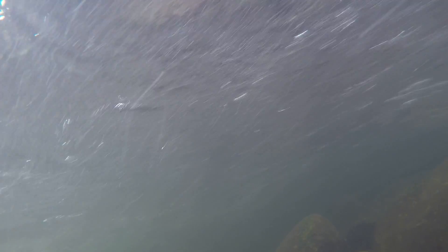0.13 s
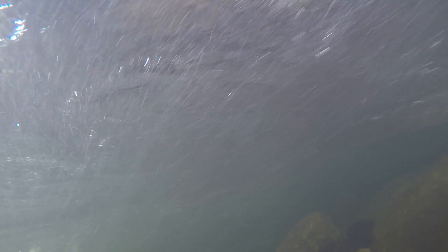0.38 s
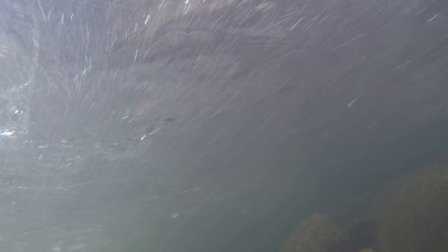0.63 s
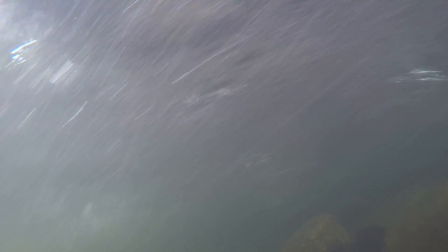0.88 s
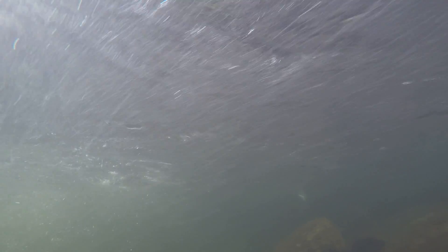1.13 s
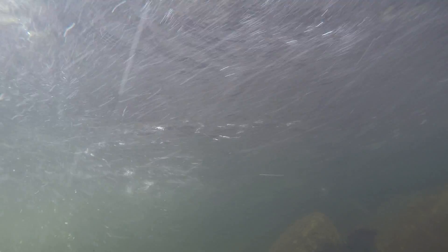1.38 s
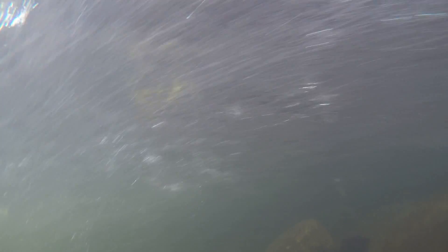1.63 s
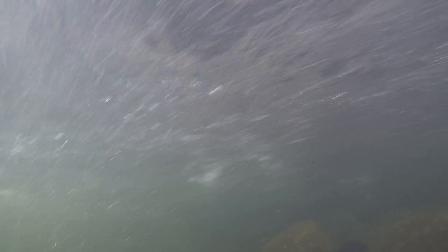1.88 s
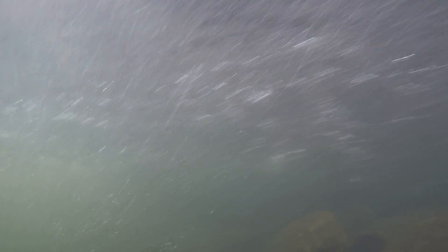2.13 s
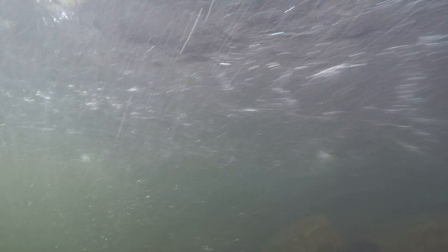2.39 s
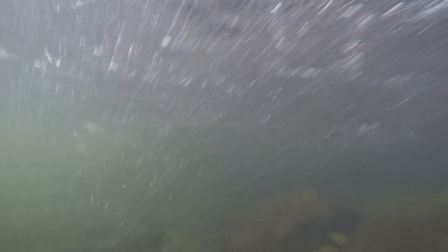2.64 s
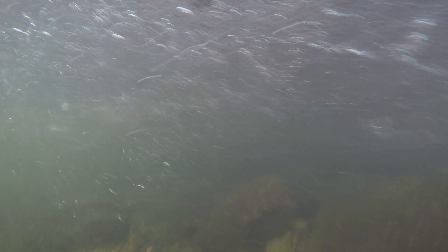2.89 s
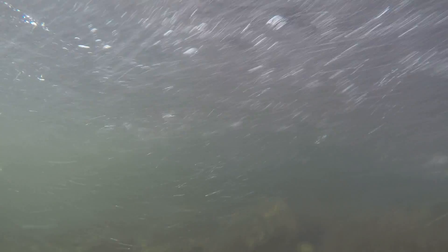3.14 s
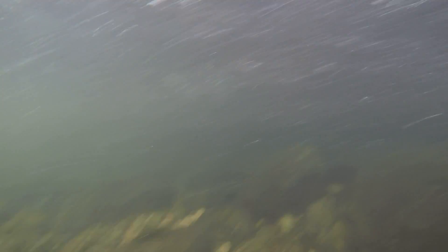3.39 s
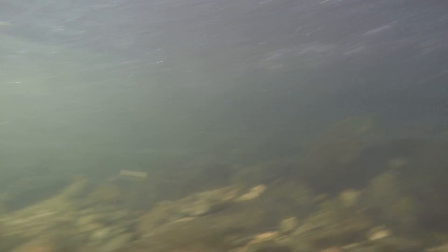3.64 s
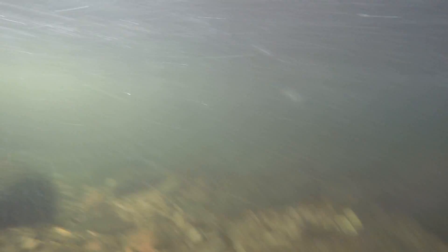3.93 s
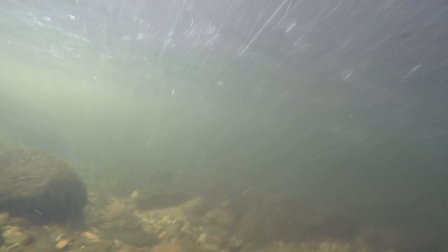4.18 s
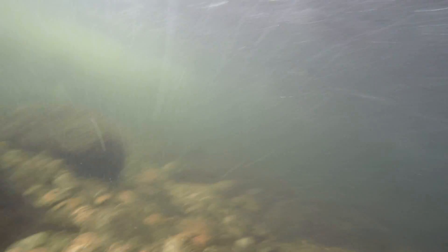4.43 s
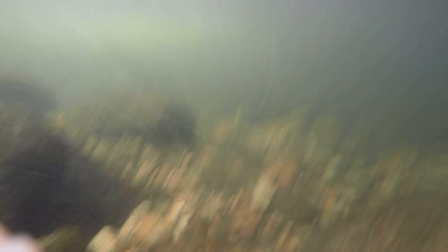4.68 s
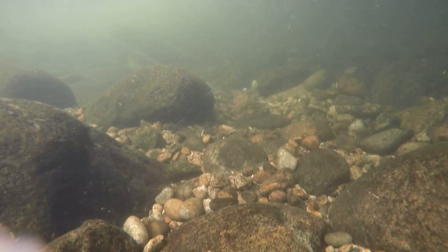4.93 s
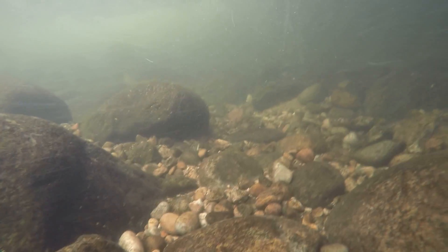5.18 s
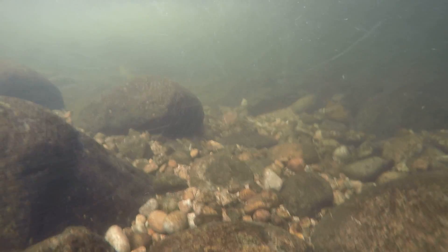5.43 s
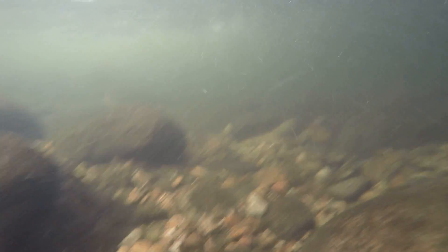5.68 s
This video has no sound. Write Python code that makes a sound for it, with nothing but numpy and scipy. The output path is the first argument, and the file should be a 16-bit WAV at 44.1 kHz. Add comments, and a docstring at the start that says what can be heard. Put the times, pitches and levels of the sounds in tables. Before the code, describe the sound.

A sealed camera housing sits in a fast shallow stream. Muffled, boxy water rush, low rumble and small bubble plinks run first, with a hard knock near one second. Loud knocks and gritty scraping follow after two seconds, then the water dips and swells back. Another heavy clack past four seconds starts a bout of rubbing over much fainter water. The microphone is inside the case, close and dry, overloading on the hits.

```python
"""Sealed camera housing in a fast stream

A sealed camera housing is held under a fast shallow stream. Noise and small impacts of water, with chirped
bubbles, are heard through damped modes of the housing; low-passed noise is the rumble of the current.
Knocks and stick-slip rubbing drive the same modes and overload the microphone; trapped air hums on.
The background sinks at times and creeps back; a faint electronic whine pulses at the frame rate."""
import sys
import numpy as np
from scipy import signal
from scipy.io import wavfile

SR = 44100
rng = np.random.default_rng(int(sys.argv[2]) if len(sys.argv) > 2 else 0)


def volts_from_decibels(level):
    """Turn decibel levels (scalar or array-like) into linear amplitude factors."""
    exponent = np.asarray(level, float) / 20
    return 10 ** exponent


def master(y):
    """Save y as 16-bit WAV."""
    cut = np.clip(np.atleast_2d(y).T, -1, 1)
    pcm = np.round(cut * 32767)  # scale
    wavfile.write(sys.argv[1], SR, pcm.astype(np.int16))


N = 255780  # samples, 5.8 s

# Modes of the housing: pitch_hz, touched_t60_s, touched_db, water_db (both are relative mode levels)
HOUSING_MODES = [(62.5, 0.011, -1, -22), (119.1, 0.074, -4.5, -17.5), (173.4, 0.044, -12.5, -22),
                 (253.8, .05, -12.5, -30), (341.4, 0.016, -8.5, -18.5), (439, 0.024, -13, -12.5),
                 (613, 0.047, -9, 8.5), (767.5, 0.017, -20.5, 3.5), (1113, 0.019, -15, -4.5),
                 (1244, 0.036, -14, -21), (1556, 0.011, -15.5, 0.5), (2417, 0.0041, -6.5, -8.5),
                 (2741, 0.0077, -4, -5), (3400, 0.0018, -11, -15), (4290, 0.0013, -16, -16),
                 (5194, 0.0016, -18.5, -21), (8420, 0.00084, -34.5, -31), (12300, 0.003, -38.5, -58.5)]
# Jolts of the trapped air: start_s, peak_db
AIR_JOLTS = [(2.666, -22), (2.704, -22.5)]
POCKET_HZ, POCKET_T60_S = 267.7, 0.14  # resonance of the trapped air


def rms_one(x):
    """Normalization by the root mean square."""
    return x / np.sqrt(np.mean(x ** 2) + 1e-20)


def drift(rate_hz):
    """Slow random fluctuation: noise through two equal one-pole low-passes, of rms 1."""
    pole = np.exp(-40 * np.pi * rate_hz / SR)  # drawn at SR / 20, then interpolated
    noise = rng.standard_normal(N // 20 + 3002)
    slow = signal.lfilter([1], [1, -2 * pole, pole * pole], noise)[3000:]
    return np.interp(np.arange(N) / 20, np.arange(len(slow)), rms_one(slow))


def low_pass(x, hz):
    """Second-order low-pass: attenuation of 12 dB per octave far above the corner."""
    return signal.sosfilt(signal.butter(2, hz, fs=SR, output="sos"), x)


def high_pass(x, order, hz):
    """Butterworth high-pass: attenuation below the corner."""
    return signal.sosfilt(signal.butter(order, hz, "high", fs=SR, output="sos"), x)


def resonate(x, hz, t60_s):
    """Damped resonance of one mode, falling steeply above its pitch; keeps white noise near its rms."""
    radius, angle = volts_from_decibels(-60 / (t60_s * SR)), 2 * np.pi * hz / SR
    gain = np.sqrt((1 - radius * radius) / 2)
    poles = [1, -2 * radius * np.cos(angle), radius * radius]
    rung = signal.lfilter([gain, 0, -gain], poles, x + 1e-18)
    return signal.sosfilt(signal.butter(4, 0.99 * hz, fs=SR, output="sos"), rung)


def grains(per_s, spread_db):
    """Random impulse train: clicks of uneven size and sign at chance moments, of rms 1."""
    sizes = volts_from_decibels(spread_db * np.minimum(rng.exponential(1, N), 5)) * rng.choice([-1, 1], N)
    return rms_one(sizes * (rng.random(N) < per_s / SR))


def add(out, sound, s):
    """Superposition: a sound is summed in at a time in seconds."""
    at = max(int(s * SR), 0)
    out[at:at + len(sound)] += sound[:N - at]


def knock_pushes():
    """Impact excitation: each contact force starts at once and decays exponentially, in three mode ranges."""
    # start_s, thump_db, body_db, click_db, contact_ms (decay by a factor e)
    knocks = [(1.133, 10.5, 7.5, 5, 0.1), (2.239, 17, 17, 5, 0.1), (2.253, -2, -12, -16, 0.65),
              (2.702, -24.5, -11.5, -10, 0.38), (4.2926, 14, 17.5, 6, 0.13), (4.2962, -10, 4.5, 2, 0.47),
              (4.302, -17, 3, -0.5, .6), (4.897, -28, -18, -12, 0.2), (4.951, -26.5, -37, -30, 0.22),
              (5.566, -41, -28, -20.5, 0.6), (5.604, -51, -31, -27, 0.59)]
    pushes = np.zeros((3, N))
    for s, thump_db, body_db, click_db, contact_ms in knocks:
        shape = np.exp(-np.arange(2000) * 1000 / (contact_ms * SR))
        for row, db in zip(pushes, (thump_db, body_db, click_db)):
            add(row, volts_from_decibels(db) * shape, s)
    return pushes


def rubbing_drags():
    """Stick-slip friction: uneven drag in strokes, with slips that rise fast and fade, in three mode ranges."""
    # start_s, end_s, drag_db, thump_db, rasp_db (thump and rasp are relative to the body)
    strokes = [(1.124, 1.141, -16, -1, -12.5), (2.268, 2.284, -25, -3, -15.5), (2.337, 2.354, -35, 15, -8),
               (2.376, 2.431, -22.5, 9.5, -16.5), (2.437, 2.57, -15, 3, -11.5),
               (2.574, 2.645, -37, 2.5, -7.5), (4.317, 4.347, -46.5, 5, -10), (4.508, 4.562, -33, 0, -7.5),
               (4.604, 4.687, -25, -0.5, -8), (4.684, 4.716, -26.5, -2.5, -16.5),
               (4.724, 4.757, -10, -1.5, -9.5), (4.76, 4.817, -19, 1, -9.5), (4.828, 4.873, -24, -1, -8.5),
               (4.892, 4.933, -26, 3, -14), (5.036, 5.154, -25, -1.5, -13), (5.394, 5.427, -33, -6, -10),
               (5.466, 5.493, -41, -9, -17), (5.702, 5.8, -20, -6.5, -16)]
    # The strongest slips: time_s (just past the peak), body_db, length_ms (the rise takes 0.4 of it)
    slips = [(2.385, -23, 17), (2.412, -13, 8.8), (2.441, -10.5, 22), (2.458, -3, 13.4), (2.522, -12, 38),
             (2.538, -12, 12), (2.548, 1.5, 14), (2.573, -5.5, 5), (2.586, -10.5, 8.3), (2.597, -1, 4.9),
             (2.613, -6.5, 10.5), (2.627, -1.5, 2), (2.639, -8.5, 9.8), (4.541, -16.5, 16.2),
             (4.643, -8, 52), (4.667, -2.5, 24.8), (4.705, -4, 7.9), (4.744, -8, 7.4), (4.775, -13.5, 16.5),
             (4.79, -23, 11), (4.808, -12, 10.7), (4.865, -21.5, 7.3), (4.927, -34.5, 13),
             (5.049, -3.5, 13.4), (5.063, -26, 40), (5.078, -10, 7.4), (5.133, -19, 5.7),
             (5.166, -25.5, 18), (5.184, -26.5, 6.1), (5.384, -14.5, 11), (5.397, -6.5, 17.3),
             (5.723, -23.5, 30), (5.759, -16.5, 33), (5.789, -17, 21)]
    edge_s = 0.0031  # how fast a stroke sets in and lets go
    catch_db, catch_hz = 5, 130     # the drag catches and lets go in all ranges at once
    judder_db, judder_hz = 0.5, 40  # each range also wavers on its own
    rubs = np.zeros((3, N))
    own_judder = judder_db * np.array([drift(judder_hz) for row in rubs])
    unevenness = volts_from_decibels(catch_db * drift(catch_hz) + own_judder)
    for start, end, drag_db, thump_db, rasp_db in strokes:
        t = np.arange(int((end - start) * SR)) / SR
        edge = np.clip(np.minimum(t, end - start - t) / edge_s, 0, 1)
        for row, uneven, db in zip(rubs, unevenness, (thump_db, 0, rasp_db)):
            add(row, volts_from_decibels(drag_db + db) * edge * uneven[int(start * SR):][:len(t)], start)
    for s, body_db, length_ms in slips:
        # coloured like the latest stroke begun
        thump_db, rasp_db = [stroke for stroke in strokes if stroke[0] < s][-1][3:]
        rise = length_ms * SR / 2500  # samples to the peak
        u = np.arange(int(8 * rise)) / rise
        burst = (u * np.exp(1 - u)) ** 2
        for row, db in zip(rubs, (thump_db, 0, rasp_db)):
            add(row, volts_from_decibels(body_db + db) * burst, s - 1.24 * rise / SR)
    return rubs


def handling():
    """Modal excitation: knocks and gritty rubbing force the low, middle and high modes of the housing."""
    low_top_hz, mid_top_hz = 400, 2000
    grit = grains(per_s=12000, spread_db=2)
    force = rubbing_drags() * grit - knock_pushes() * (1 + 0.76 * grit)
    out = np.zeros(N)
    for k, (hz, t60_s, touched_db, water_db) in enumerate(HOUSING_MODES):
        mode_range = int(hz > low_top_hz) + int(hz > mid_top_hz)
        sign = (-1) ** k  # neighbouring modes have opposite sign
        out += sign * volts_from_decibels(touched_db) * resonate(force[mode_range], hz, t60_s)
    return out


def air_pocket():
    """Free vibration: after a jolt trapped air hums as an exponentially decaying sine."""
    out, t = np.zeros(N), np.arange(SR // 2) / SR
    for s, peak_db in AIR_JOLTS:
        add(out, volts_from_decibels(peak_db - 60 * t / POCKET_T60_S) * np.sin(2 * np.pi * POCKET_HZ * t), s)
    return out


def bubble(size, hz, cycles, rise):
    """Bubble resonance: it swells, rings a few cycles and dies while its pitch climbs from hz."""
    turn = np.arange(int(3 * cycles * SR / hz)) * hz / SR  # time in cycles of the starting pitch
    swell = (1 - np.exp(-turn / 0.54)) ** 2 * np.exp(-2 * turn / cycles)
    return size * swell / swell.max() * np.sin(2 * np.pi * turn * (1 + rise * turn / cycles))


def loud_bubbles():
    """Isolated bubble resonances that stand out of the rush."""
    # time_s (about three cycles after the start), peak_db, starting_pitch_hz
    bubbles = [(0.008, -26, 2015), (0.183, -31.5, 700), (1.048, -31, 990), (1.251, -33, 2550),
               (1.426, -39.5, 3350), (1.643, -35.5, 4180), (1.698, -28.5, 2930), (1.715, -27, 1540),
               (1.73, -30.5, 3540), (1.742, -28.5, 726), (1.897, -33, 740), (2.316, -35, 2560),
               (2.684, -46, 1610.0), (3.056, -32.5, 2940), (3.325, -26.5, 2960), (3.327, -26.5, 693),
               (3.352, -24.5, 1640), (3.361, -36.5, 3680), (3.583, -36, 1620.0), (3.7, -26, 646),
               (3.766, -30, 655), (3.792, -30, 755), (4.124, -24.5, 616), (5.671, -53, 2560)]
    out = np.zeros(N)
    for s, peak_db, hz in bubbles:
        add(out, bubble(volts_from_decibels(peak_db), hz, cycles=12.6, rise=0.024), s - 3.02 / hz)
    return out


def rush(together_db, own_db, damping, ticks_db):
    """Random excitation of modes: water impacts and lone grit grains, swelling together and mode by mode."""
    out = np.zeros(N)
    swell_db = together_db * drift(9)
    ticks = volts_from_decibels(ticks_db) * grains(per_s=36, spread_db=4.5)
    for hz, t60_s, touched_db, water_db in HOUSING_MODES:
        impacts = volts_from_decibels(swell_db + own_db * drift(24)) * rng.standard_normal(N)
        shaken = resonate(impacts + ticks, hz, t60_s * damping)
        out += volts_from_decibels(water_db) * high_pass(shaken, 2, 0.81 * hz)
    trapped = np.arange(N) / SR > AIR_JOLTS[0][0]  # the air pocket hums along once it is caught
    pocket_db = -0.5  # on the scale of the water levels of the modes
    out += volts_from_decibels(pocket_db) * resonate(trapped * rng.standard_normal(N), POCKET_HZ, POCKET_T60_S)
    return rms_one(out)


def fizz(count, level_db, spread_db, low_hz, high_hz, cycles):
    """Random superposition of bubble resonances: small bubbles swept past at chance moments and pitches."""
    out = np.zeros(N)
    for when, pitch, size in rng.random((count, 3)):
        hz = low_hz * (high_hz / low_hz) ** pitch
        size_db = level_db - spread_db * np.log(1 - .98 * size)
        add(out, bubble(volts_from_decibels(size_db), hz, cycles, rise=0.079), when * N / SR)
    return out


def rumble():
    """Turbulent pressure: eddies push on the shell, as lumpy noise far down in the bass."""
    return rms_one(low_pass(rng.standard_normal(N), 44.6) * volts_from_decibels(2.5 * drift(0.91)))


def electronics(hushed):
    """Electronic noise and square gating: preamplifier hiss of rms 1 and a whine on for half of every frame."""
    frames_per_s, whine_start_s = 23.976, .019
    whine_hz, whine_db, hiss_hz = 10287, -7, 5000  # whine peak relative to the hiss rms
    t = np.arange(N) / SR
    on = ((t - whine_start_s) * frames_per_s % 1 < .5) & ~hushed
    dull = signal.lfilter([1], [1, -np.exp(-2 * np.pi * hiss_hz / SR)], rng.standard_normal(N))
    hiss = rms_one(low_pass(dull, 14000))
    return hiss + volts_from_decibels(whine_db) * on * np.sin(2 * np.pi * whine_hz * t)


def sinking_db(t):
    """Piecewise linear attenuation in dB: each sink falls, then climbs at its own rate; the deepest holds."""
    # start_s, depth_db, fall_s, recovery_db_per_s
    sinks = [(2.62, 21, 0.11, 23), (4.278, 6.5, .004, 4), (5.325, 12.5, 0.008, 2.5)]
    depths = []
    for s, depth_db, fall_s, recovery in sinks:
        falling = depth_db * (t - s) / fall_s
        climbing = depth_db - recovery * (t - s - fall_s)
        depths.append(np.clip(np.minimum(falling, climbing), 0, None))
    return -np.max(depths, axis=0)


def scene():
    """Linear superposition of handling, water and electronics at the one microphone."""
    # Vigour of the current, as the level of its rush before any sinking: time_s, level_db
    flow = [(0, -47), (.5, -41), (.95, -41), (1.3, -44), (2.2, -38.5), (3.2, -38.5), (3.8, -39.5),
            (4.3, -43), (4.9, -48.5), (5.2, -40.5), (5.8, -47)]
    t = np.arange(N) / SR
    flow_db = np.interp(t, *np.transpose(flow))
    sunk_db = sinking_db(t)
    hushed = (t > 4.28) & (t < 5.335)  # for a while the water is much fainter and the whine is silent
    rush_db = flow_db + 0.73 * sunk_db - 12.5 * hushed  # the rush takes a share of each sink
    # the rumble follows a share of the swing of the rush
    rumble_db = -30.5 + 0.39 * (flow_db - flow_db.mean()) + sunk_db - 8 * hushed
    hiss_db = -67.5 + sunk_db
    water = rush(together_db=1, own_db=4.0, damping=0.93, ticks_db=-6.5)
    # fizz levels are relative to the rush
    water += fizz(count=800, level_db=-19, spread_db=4, low_hz=2300, high_hz=6140, cycles=15)
    water += fizz(count=400, level_db=-8.5, spread_db=-0.5, low_hz=554, high_hz=898, cycles=8.6)
    water += fizz(count=200, level_db=-16, spread_db=5.0, low_hz=1100, high_hz=3140, cycles=14.0)
    background = volts_from_decibels(rush_db) * water + volts_from_decibels(rumble_db) * rumble() + volts_from_decibels(hiss_db) * electronics(hushed)
    return (handling() + air_pocket() + loud_bubbles() + background)[None]


def band_limit(x):
    """A steep low-pass at the top of the band."""
    return signal.sosfilt(signal.butter(12, 16480, fs=SR, output="sos"), x)


def record(dry):
    """Saturation: the deepest bass is cut, then peaks flatten towards the overload level."""
    overload, knee = .97, 8  # a higher knee bends more sharply
    cut = high_pass(dry, 1, 12)
    flat = cut / (1 + np.abs(cut / overload) ** knee) ** (1 / knee)
    return band_limit(flat)


dry = scene()
out = record(dry)
master(out)
```